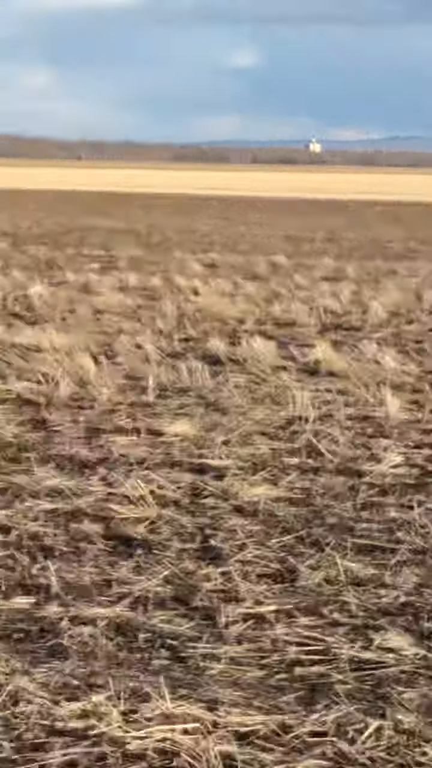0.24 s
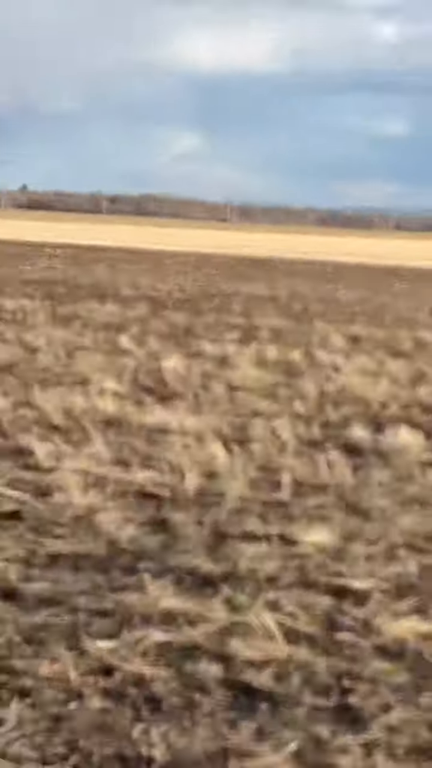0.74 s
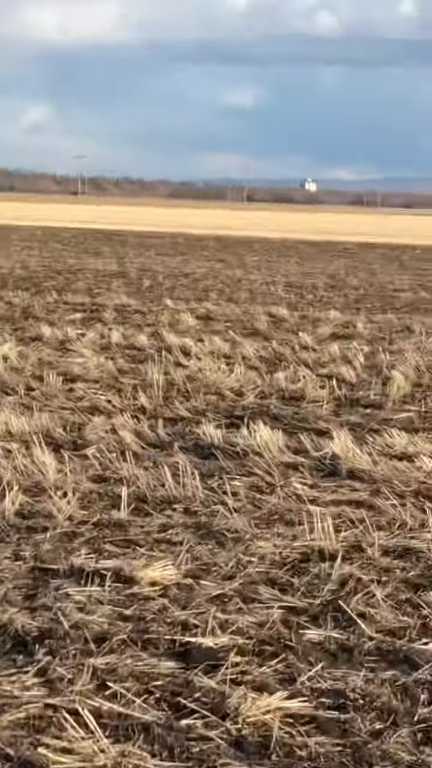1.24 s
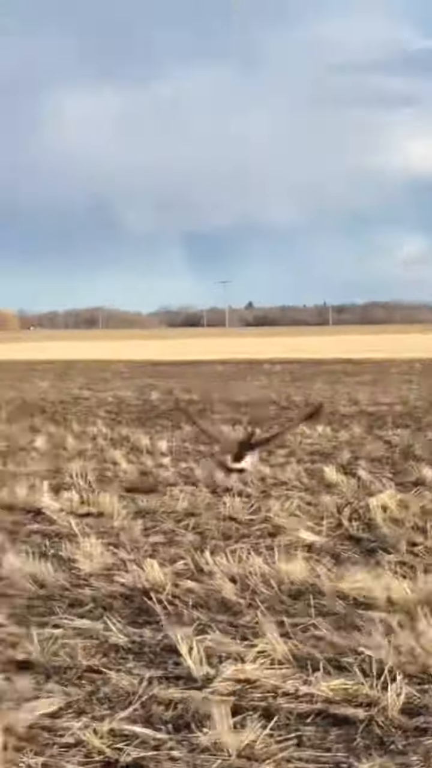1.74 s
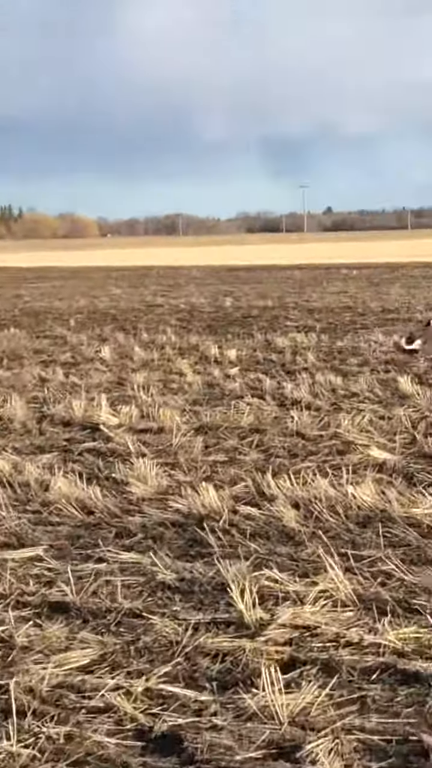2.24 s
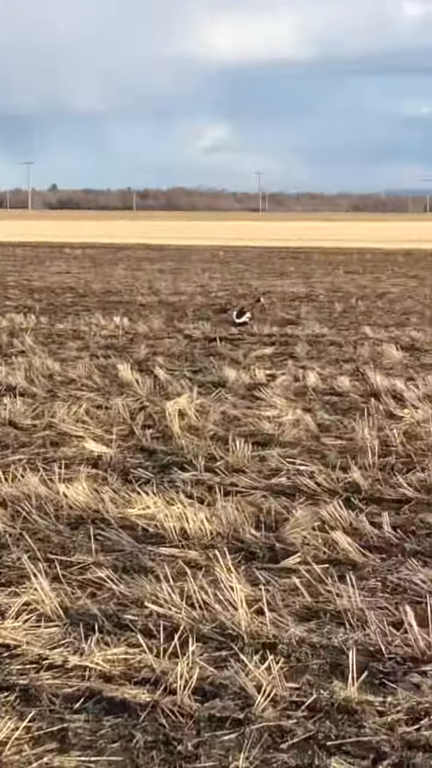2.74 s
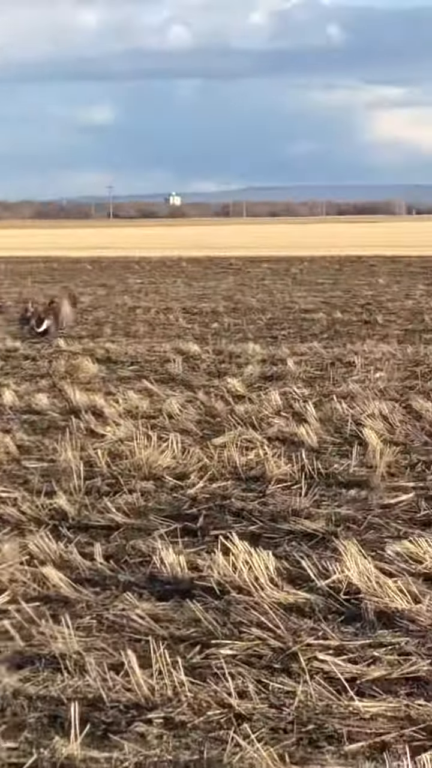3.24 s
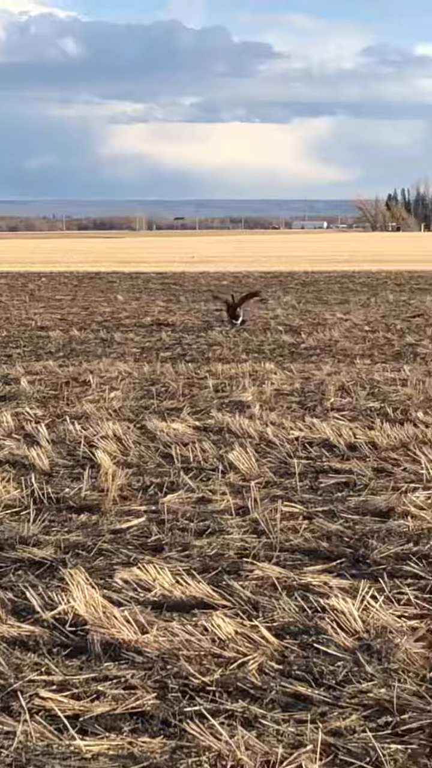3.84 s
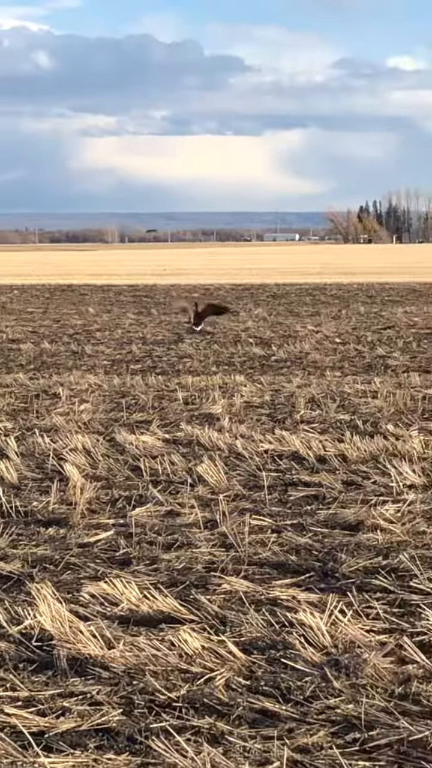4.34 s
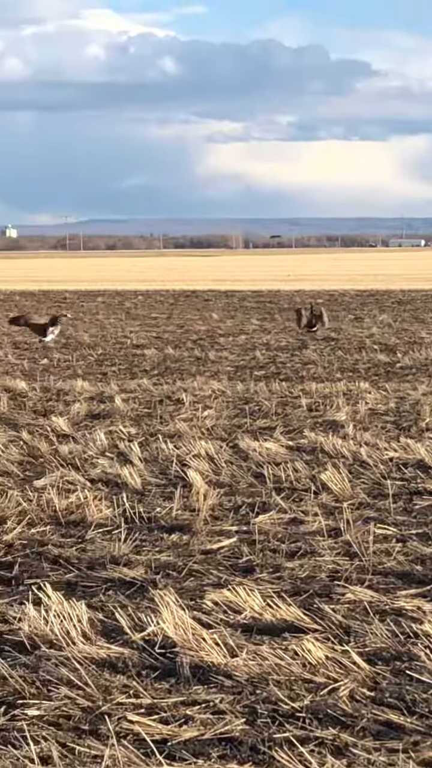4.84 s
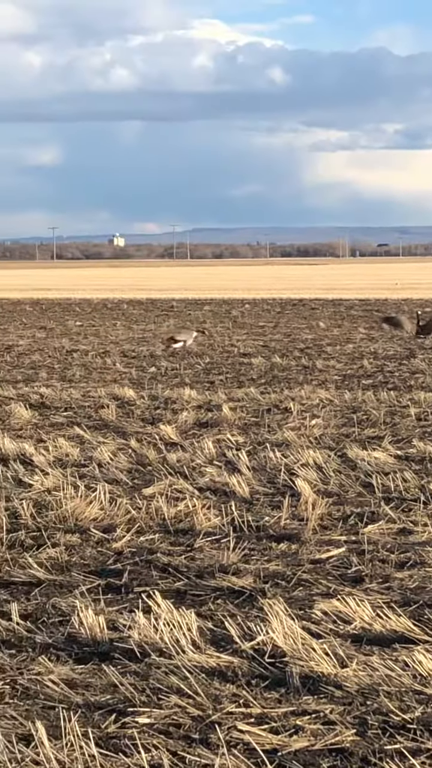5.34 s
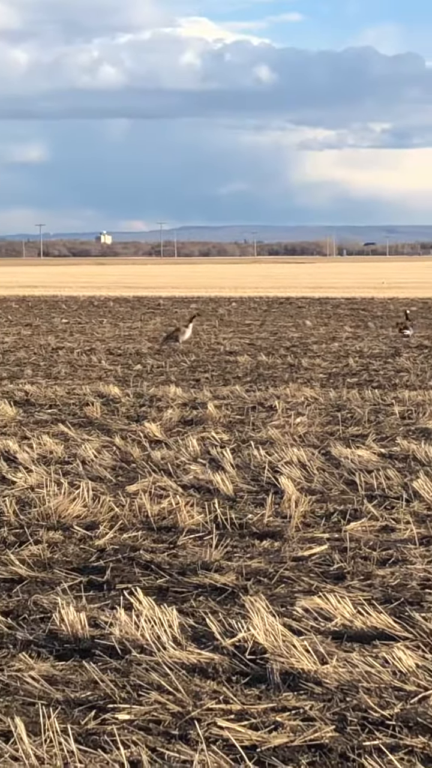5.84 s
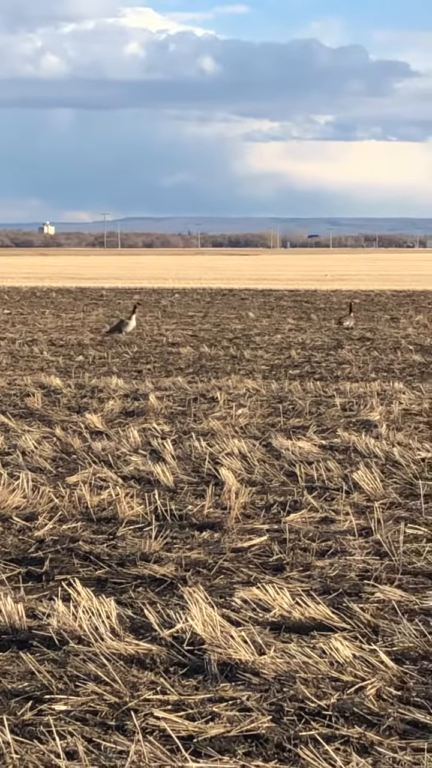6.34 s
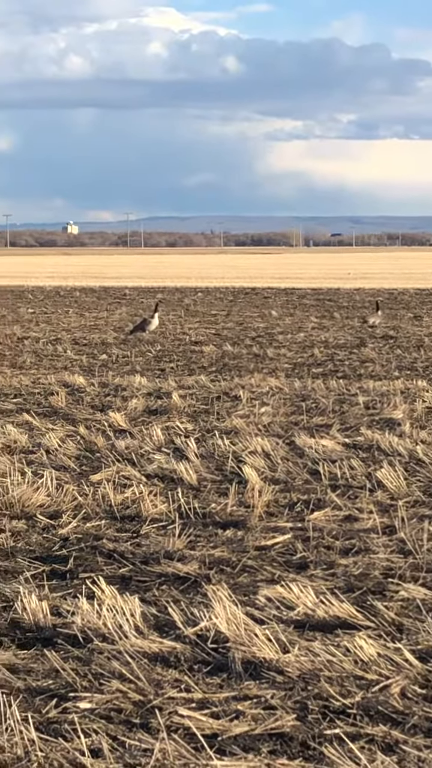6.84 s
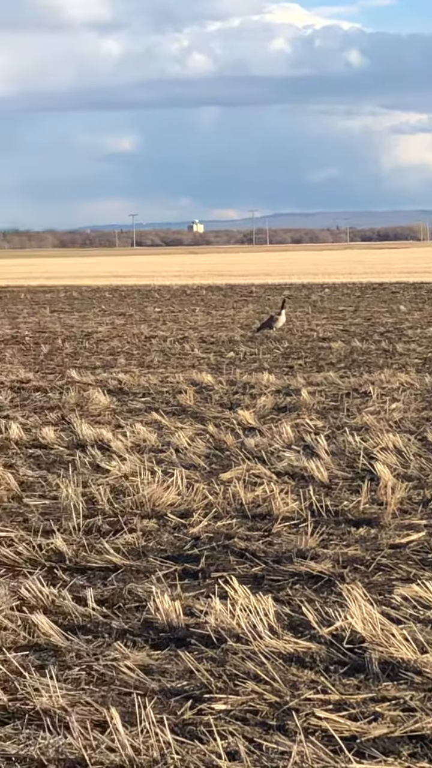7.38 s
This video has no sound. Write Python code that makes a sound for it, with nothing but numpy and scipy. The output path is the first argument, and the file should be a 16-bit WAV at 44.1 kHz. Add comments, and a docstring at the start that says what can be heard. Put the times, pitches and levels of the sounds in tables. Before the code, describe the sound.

An open field without echo, heard through a handheld phone. From 0 s dry straw crackles and cloth rubs close by, with sharp stalk snaps, soft low bumps and gusty wind murmur. At 0.5-0.7 s a goose gives a loud, cracked nasal honk, rising from rough to clear; another two-part call comes at 0.9-1.2 s, and a raspy then longer clear honk at 1.9-2.2 s. Wind drops out around 2.1 s. By 2.4 s a big slow engine far off swells into a deep steady throb, with low gliding moans at 2.3-3 and 3.5-4.1 s. Weaker honks follow: a longer one at 3.2-3.6 s, short buzzy ones at 3.7-4 s and a tiny croak at 4.7 s. Rustling becomes sparse. The rumble strengthens to 7.5 s over faint hiss, with a bump at 6.5 s, faint rapid high pips around 7 s, and a last small rustle.

```python
"""Geese honk close to a phone in an open stubble field: partials of a fast membrane, chopped by a slower one.
Straw and cloth beside it rustle, bump, tick and swish, made of filtered noise grains and short tone bursts.
A big slow engine idles far off, a stack of wavering cosine orders whose throb swells, with low gliding moans
and a short run of faint high pips. Wind murmurs low over a faint field hiss, both of coloured noise."""
import sys
import numpy as np
from scipy import signal
from scipy.fft import rfft, irfft, next_fast_len
from scipy.io import wavfile
from scipy.ndimage import uniform_filter1d

SR = 44100
rng = np.random.default_rng(int(sys.argv[2]) if len(sys.argv) > 2 else 0)


def master(y):
    """Save y as 16-bit WAV."""
    cut = np.clip(np.atleast_2d(y).T, -1, 1)
    pcm = np.round(cut * 32767)  # scale
    wavfile.write(sys.argv[1], SR, pcm.astype(np.int16))


N = 335601  # samples in the scene
ENGINE_HZ = 23.08  # engine cycle rate


def undb(db):
    """Amplitude factor of a level in dB."""
    return 10 ** (np.asarray(db) / 20)


def shape(points, hz):
    """dB of a (Hz, dB) outline, straight on a log axis."""
    f, db = np.transpose(points)
    return np.interp(np.log(np.maximum(hz, 1)), np.log(f), db)


def colour(x, points):
    """Filter to a (Hz, dB) outline and bring to rms 1."""
    n = next_fast_len(len(x), True)
    bins_hz = np.arange(n // 2 + 1) * SR / n
    y = irfft(rfft(x, n) * undb(shape(points, bins_hz)), n)[:len(x)]
    return y / np.sqrt(np.mean(y ** 2))


def band(x, lo_hz, hi_hz):
    """Band-pass between two corners, the upper one at most 20 kHz."""
    return signal.sosfilt(signal.butter(2, [lo_hz, min(hi_hz, 20000)], "band", fs=SR, output="sos"), x)


def walk(rate, size=N):
    """Random levels held 1 / rate s and slewed twice; spread near 1."""
    k = max(int(SR / rate), 1)
    held = np.repeat(rng.standard_normal(size // k + 1), k)
    return 1.3 * uniform_filter1d(uniform_filter1d(held, k), k)[:size]


def span(table, fade_s):
    """Sample range, interpolated columns and a soft-edged gate of one table."""
    s, *columns = np.transpose(table)
    at = np.arange(int(s[0] * SR), min(int(s[-1] * SR), N))
    t = at / SR
    gate = np.clip(np.minimum(t - s[0], s[-1] - t) / fade_s, 0, 1)
    return at, [np.interp(t, s, c) for c in columns], gate


def follow(points):
    """Amplitude along the scene from (s, dB) points."""
    return undb(np.interp(np.arange(N) / SR, *np.transpose(points)))


def blips(table, cycles):
    """Short rounded tone bursts from rows of (start s, level dB, pitch Hz)."""
    out = np.zeros(N)
    for s, db, hz in table:
        t = np.arange(int(cycles * SR / hz))
        i = int(s * SR)
        out[i:i + len(t)] += undb(db) * np.hanning(len(t)) * np.sin(2 * np.pi * hz * t / SR)
    return out


def geese():
    """Partials of the fast membrane, each with side lines from the slow one, all through the throat."""
    # One row a note. Each row: start, length and release in seconds, level in dB at start and at end,
    # lift of the upper partials by the open bill in dB per octave at start and at end,
    # bend of that change (under 1 early, over 1 late), voice, pitches in Hz at even steps along the note.
    honks = [ (0.507, 0.037, 0.012, -35, -38, -10, -5, 1.01, "breaking", [735, 750, 777, 750]),
             (0.541, 0.061, 0.012, -35, -33, -11, 2.5, 1.2, "croaking", [500, 516, 536, 548, 545]),
             (0.594, 0.106, 0.027, -28.5, -31.5, -1.5, -10, 0.9, "clear", [745, 735, 703, 715, 722, 699]),
             (0.86, 0.09, 0.012, -56, -32.5, 3, 1.5, 0.6, "hoarse", [507, 520, 532, 545, 582]),
             (0.95, 0.015, 0.02, -40, -37.5, 2, 6, 1.01, "hoarse", [745, 690]),
             (1.074, 0.035, 0.012, -35, -35, -1, -2, 1.01, "breaking", [724, 735, 765, 730]),
             (1.104, 0.032, 0.012, -46, -33, 5, -3, 0.4, "croaking", [512, 538, 533]),
             (1.133, 0.082, 0.03, -26.5, -31.5, -3, -7, 1.01, "clear", [743, 722, 714]),
             (1.89, 0.112, 0.012, -49, -37.5, 1.5, 4.5, 0.7, "rasping", [519, 506, 520, 585, 566, 592]),
             (1.994, 0.206, 0.03, -34.5, -36, -7, 2.5, 4, "clear", [736, 740, 750, 731, 735, 742, 758, 730]),
             (3.2, 0.048, 0.012, -44, -47, 3, 5, 1.01, "hoarse", [675, 700, 755]),
             (3.25, 0.295, 0.022, -41.5, -39, -4, -4.5, 1.01, "clear", [500, 535, 552, 524, 522, 527, 536, 542, 545]),
             (3.553, 0.02, 0.027, -48, -41.5, -3, -6, 1.01, "buzzing", [752, 714]),
             (3.7, 0.065, 0.012, -58, -46.5, 4, 10, 1.01, "rasping", [525, 553, 559]),
             (3.768, 0.045, 0.018, -41, -52, 8, 20.5, 0.4, "buzzing", [796, 779]),
             (3.908, 0.097, 0.027, -48, -36, 21, -5.5, 0.25, "clear", [708, 734, 734, 728, 720]),
             (4.702, 0.03, 0.02, -48.5, -51, 8, 16, 0.4, "croaking", [675, 709]), ]
    # Voice by name: flutter depth at the start and at the end (0-1), roughness (0-1).
    voices = {"clear": (.08, 0, .008), "breaking": (0, .55, .03), "croaking": (.25, 1, .07),
              "buzzing": (.75, .55, .035), "hoarse": (1, .45, .22), "rasping": (.9, 1, .36)}
    # The fast membrane favours its lowest two partials. Levels in dB of partials 1, 2, 3 ..; the last one repeats.
    partials_db = [0, -0.5, -8.5, -14, -12, -11, -9.5, -17.5]
    # Resonances of windpipe and bill. Each row: frequency in Hz, gain in dB.
    throat = [(300, -12.5), (750, -8.5), (1100, 3), (1350, 5.5), (1700, -4), (2200, 1), (2900, -3.5),
              (3700, -10), (4500, -19), (5500, -13.5), (7000, -19.5), (9500, -25), (13000, -37)]
    # Side lines are faint unless they fall on the windpipe resonance or ride the bright partials.
    # Each row: frequency in Hz, gain in dB.
    side_lines = [(500, -10), (950, -18.5), (1300, -2.5), (1700, -6), (2500, -6.5), (5000, -8.5)]
    flutter_hz = 212.6  # the slower membrane that chops the raspy notes
    out = np.zeros(N)
    for *note, kind, pitches_hz in honks:
        start_flutter, end_flutter, rough = voices[kind]
        at, hz, db, bright_db, gate = sing(*note, pitches_hz)
        size = len(at)
        phase = 2 * np.pi * np.cumsum(hz * (1 + 0.14 * rough * walk(400, size))) / SR
        slow = 2 * np.pi * np.cumsum(flutter_hz * (1 + 0.18 * rough * walk(135, size))) / SR
        flutter = np.linspace(start_flutter, end_flutter, size)
        voice = 0
        for k in range(1, 17):
            octaves_up = np.log2(np.clip(k * hz, 2 * hz, 3300) / (2 * hz))
            k_db = partials_db[min(k, len(partials_db)) - 1] + bright_db * octaves_up
            # the open bill lifts the middle partials more than the very top
            k_db = k_db - 0.41 * np.maximum(bright_db, 0) * np.log2(np.maximum(k * hz / 4500, 1))
            # upper partials swell and fade on their own as bill and neck move
            k_db = k_db + (k > 3) * 3.2 * walk(30, size)
            start = 2 * np.pi * rng.random()
            for side in (0, -1, 1):
                line_hz = k * hz + side * flutter_hz
                line_db = k_db + shape(throat, line_hz) - shape(throat, 2 * hz)
                line_db = line_db + abs(side) * shape(side_lines, line_hz)
                line = np.cos(k * phase + side * slow + start)
                voice = voice + flutter ** abs(side) * undb(line_db) * line
        # air rushes past the membranes as they lose contact
        breath = rough * colour(rng.standard_normal(size), throat) * (1 + np.cos(slow))
        out[at] += gate * undb(db) * (np.sqrt(2) * voice + 0.74 * breath)
    return out


def sing(start_s, length_s, release_s, db0, db1, bright0_db, bright1_db, bend, pitches_hz):
    """Samples, pitch, level, bill lift and gate of one note, which fades and sags as the breath runs out."""
    attack_s, release_db, sag_hz_per_s = .005, 20, 1900
    effort_db_per_hz = 0.06  # pushing harder raises pitch and level together
    at = np.arange(int(start_s * SR), int((start_s + length_s + release_s) * SR))
    t = at / SR - start_s
    u = np.clip(t / length_s, 0, 1)
    late = np.maximum(t - length_s, 0)
    hz = np.interp(u, np.linspace(0, 1, len(pitches_hz)), pitches_hz)
    # only pitch above or below the straight glide counts as effort
    push_db = effort_db_per_hz * (hz - hz[0] - (hz[-1] - hz[0]) * u)
    db = db0 + (db1 - db0) * u ** bend + push_db - release_db * late / release_s
    bright_db = bright0_db + (bright1_db - bright0_db) * u ** bend
    gate = np.clip(np.minimum(t, length_s + release_s - t) / attack_s, 0, 1)
    return at, hz - sag_hz_per_s * late, db, bright_db, gate


def rustle():
    """Dense crackle of uneven grains over rubbing noise, in a bright and a dull part."""
    # The faint rustle between rubs. Each row: time in seconds, level of the top in dB, body over top in dB.
    faint = [(0, -69, -8), (0.55, -74, -5), (1.35, -69, 2), (2.6, -72, 0.5), (3.05, -82, 0.5),
             (4.3, -83, 4), (5.5, -88, 12), (6.8, -84, 9), (7.3, -88, 10), (7.55, -79, 8)]
    # Straw and cloth rubbed. Each row: strongest moment in seconds, seconds to rise 10 dB,
    # seconds to fall 10 dB, peak level of the top in dB, body over top in dB.
    rubs = [(0.03, .1, .08, -58.5, 0.5), (0.434, .02, .017, -50, 3), (0.78, .04, .08, -57, 1),
            (0.857, .05, .03, -53, 6), (0.943, .06, .04, -58, 5), (1.147, .06, .055, -50, -5),
            (1.3, .03, .05, -66, 8), (1.537, .018, .055, -52, 5), (1.686, .015, .06, -60, 0.5),
            (1.756, .05, .05, -60, -10), (1.851, .01, .02, -55, -10), (1.886, .03, .025, -51, 5),
            (1.94, .05, .06, -64, 6), (2.135, .03, .02, -60, -10), (2.175, .03, .08, -57, -5),
            (2.235, .07, .08, -49, -5), (2.29, .04, .025, -58, 5), (2.434, .15, .05, -64, 3),
            (2.72, .015, .15, -60.5, 0.5), (2.794, .08, .02, -64, 0.5), (2.878, .1, .035, -66, 3),
            (3.118, .012, .06, -67, 10), (3.268, .09, .2, -62, 1.5), (3.64, .1, .1, -80, 19),
            (3.756, .03, .07, -69.5, 11), (4.116, .05, .06, -75, -3), (4.745, .02, .04, -77, 19),
            (4.88, .08, .08, -80, 8), (5.0, .06, .1, -80, 8), (5.3, .1, .1, -82, 8),
            (5.49, .04, .04, -81, 20), (7.05, .3, .15, -82, 8), (7.565, .015, .4, -67, 5)]
    # Tone of the rubbing. Each row: frequency in Hz, density in dB per Hz.
    outline = [(150, -21.5), (300, -10), (600, -8), (1400, -9.5), (2500, -10), (4400, -13), (8500, -21),
               (12600, -20.5), (15000, -19), (16000, -19)]
    parts = []
    # share: part of the samples that carry a grain
    for lo_hz, hi_hz, share, patchy_db in ((2390, 20000, .4, 2.15), (180, 2570, .02, 2.4)):
        grains = rng.standard_normal(N) * undb(3.13 * rng.exponential(size=N)) * (rng.random(N) < share)
        rub = colour(grains / grains.std() + rng.standard_normal(N), outline)
        rub = rub * undb(patchy_db * (walk(50) + 0.76 * walk(300)))
        parts.append(band(rub, lo_hz, hi_hz))
    # both parts are scaled by the strength of the upper treble
    top, body = np.array(parts) / band(parts[0], 9570, 16050).std()
    s, db, body_db = np.transpose(faint)
    t = np.arange(0, N + 32, 32) / SR  # coarse time for the envelopes
    top_power = undb(2 * np.interp(t, s, db))
    body_power = top_power * undb(2 * np.interp(t, s, body_db))
    for s, rise_s, fall_s, db, body_db in rubs:
        power = undb(2 * db - 20 * np.maximum((s - t) / rise_s, (t - s) / fall_s))
        top_power = top_power + power
        body_power = body_power + power * undb(2 * body_db)
    fine_t = np.arange(N) / SR
    top_level = np.interp(fine_t, t, np.sqrt(top_power))
    body_level = np.interp(fine_t, t, np.sqrt(body_power))
    return top_level * top + body_level * body


def ticks():
    """Each stalk cracks for a millisecond or two, with a duller knock that is strong in some."""
    # Snapping stalks. Each row: start in seconds, peak of the crack in dB, knock over crack in dB.
    snaps = [(0.0184, -32.5, -7), (0.0548, -32, -7), (0.0807, -37, 2), (0.1306, -43.5, 9),
             (0.1481, -46.5, 9), (0.187, -43, 5), (0.2404, -47.5, 17), (0.2648, -44, -9.5),
             (0.7532, -43.5, 9.5), (0.7726, -41.5, 13), (0.8387, -34.5, 9), (0.8515, -27.5, -6),
             (1.2635, -44, 0), (1.4825, -41, -15), (1.5229, -27.5, -7), (1.5404, -35, -6),
             (1.6866, -36.5, 3.5), (1.7434, -45, 11.5), (1.8552, -38, 9), (1.8751, -27.5, 1.5),
             (1.935, -46, 12), (2.2814, -39.5, 11.5), (2.4644, -54, 12), (2.6344, -46, -1),
             (2.7831, -40, -3), (2.8444, -45, -8), (3.1192, -44, 8), (4.0497, -58, 11), (4.4508, -42, -4.5),
             (5.4884, -63, 15), (7.07, -53, -3), (7.416, -51, 9), (7.5208, -55.5, 18)]
    out, t = np.zeros(N), np.arange(600) / SR
    for s, db, low_db in snaps:
        crack = band(rng.standard_normal(600) * np.exp(-t / .0011), 2500, 15000)
        knock = band(rng.standard_normal(600) * np.exp(-t / 0.0014), 630, 2550)
        i = int(s * SR)
        out[i:i + 600] += undb(db) * (crack / abs(crack).max() + undb(low_db) * knock / abs(knock).max())
    return out


def swish():
    """Woven cloth slides with an airy whistle: noisy bands at the thread rate and its multiples."""
    # One table a slide. Each row: time in seconds, thread rate in Hz, level in dB before the gain of each band.
    slides = [
        [(0.98, 1770, -51), (1.06, 1740, -65)],
        [(1.63, 1763, -57), (1.7, 1778, -53), (1.85, 1835, -57)],
        [(2.44, 1900, -60), (2.892, 1864, -60), (2.98, 1790, -68)],
        [(4.46, 1575, -74), (4.656, 1590, -67), (4.68, 1590, -78)],
        [(6.82, 1480, -70), (7.0, 1500, -64), (7.08, 1480, -72)],
    ]
    out = np.zeros(N)
    for table in slides:
        at, (hz, db), gate = span(table, 0.013)
        phase = 2 * np.pi * np.cumsum(hz) / SR
        for k, k_db in ((1, 3), (2, -7), (3, -16)):
            level = gate * undb(db + k_db + 2.2 * walk(36.7, len(at)))
            out[at] += level * walk(450, len(at)) * np.cos(k * phase)
    return out


def bumps():
    """Soft bumps against the phone, each a few rounded cycles of a low tone."""
    # Each row: start in seconds, peak level in dB, pitch in Hz.
    knocks = [(0.118, -47, 287), (0.301, -45.5, 355), (0.383, -50, 332), (0.78, -39.5, 366),
              (1.119, -39, 242), (1.429, -48.5, 318), (1.52, -41.5, 283), (1.697, -41.5, 353),
              (1.791, -45, 342), (2.256, -44, 255), (6.489, -46, 205)]
    return blips(knocks, 7.9)


def engine():
    """Steady orders of the engine cycle, each wavering on its way through the air."""
    # Strength of the orders. Each row: multiple of the cycle rate, level in dB.
    orders = [(2, -20.5), (3, -19), (4, -6.5), (5, -1), (6, -16.5), (7, -13.5), (8, -18), (9, -27),
              (10, -28.5), (12, -40), (13, -37), (14, -38), (15, -50), (16, -37), (17, -35.5)]
    # Engine as heard. Each row: time in seconds, level in dB, lift of the orders over the fifth in dB.
    swell = [(0.1, -66, -14), (0.35, -57, -12), (0.5, -51, -4), (1.08, -51, -1), (1.35, -59, 5),
             (2.12, -52, 3.5), (2.41, -37, -6), (2.9, -38, -3), (4.5, -37.5, -2.5), (5.03, -35.5, -6),
             (5.55, -37, 2), (7.5, -32.5, 1.5)]
    # The strongest order fades briefly on its way over the field.
    # Each row: middle in seconds, half width in seconds, depth in dB.
    fades = [(2.65, .15, -9), (4.72, .14, -6)]
    step = 8  # samples between values of the low engine tones
    t = np.arange(0, N, step) / SR
    s, db, high_db = np.transpose(swell)
    db, high_db = np.interp(t, s, db), np.interp(t, s, high_db)
    fade_db = sum(depth_db * np.exp(-((t - mid_s) / half_s) ** 2) for mid_s, half_s, depth_db in fades)
    phase = 2 * np.pi * (ENGINE_HZ * t + .36)
    throb = 0
    for k, k_db in orders:
        side_db = high_db if k > 5 else fade_db if k == 5 else 0
        # the exhaust pipe delays orders on either side of its resonance, so each firing is a short sweep
        sweep = 1.1 * (k - 5) ** 2 + .06 * (k - 5) ** 3
        # times step, as these walks run on the coarse time: 7 and 6 new values a second
        drift = sweep + .22 * walk(7 * step, len(t))
        waver_db = 1.2 * walk(6 * step, len(t))
        throb = throb + undb(k_db + side_db + waver_db) * np.cos(k * phase + drift)
    throb = signal.resample_poly(np.sqrt(2) * throb * undb(db), step, 1)[:N]
    # uneven firings fill the gaps between the orders
    outline = [(25, -31), (45, -8.5), (90, 4), (130, 2.5), (190, -12), (270, -40.5), (500, -68)]
    uneven = colour(rng.standard_normal(N), outline)
    return throb + uneven * np.interp(np.arange(N) / SR, t, undb(db - 11))


def moans():
    """Two low moans from far off: sine tones that glide up, then ease down a little."""
    # One table a moan. Each row: time in seconds, pitch in Hz, level in dB.
    glides = [
        [(2.25, 62, -46), (2.508, 68.9, -47), (3.0, 68.7, -47), (3.05, 67.5, -66)],
        [(3.5, 61, -38), (3.758, 74.2, -43), (4.1, 72, -53)],
    ]
    out = np.zeros(N)
    for table in glides:
        at, (hz, db), gate = span(table, 0.24)
        out[at] += np.sqrt(2) * gate * undb(db) * np.sin(2 * np.pi * np.cumsum(hz) / SR)
    return out


def pips():
    """Faint high pips at the engine cycle rate for a while, each of uneven strength and pitch."""
    from_s, to_s, mean_db, mean_hz = 6.8104, 7.27, -65, 2630
    times = np.arange(from_s, to_s, 1 / ENGINE_HZ)
    chance = rng.standard_normal((len(times), 2))
    return blips(zip(times, mean_db + 4.5 * chance[:, 0], mean_hz + 70 * chance[:, 1]), 22.)


def wind():
    """Gusty low wind on the phone: coloured noise with a quickly wandering level."""
    # Each row: time in seconds, level in dB.
    gusts = [(0.0, -49.5), (0.72, -55.5), (0.78, -44.5), (1.06, -49.5), (1.12, -46), (1.25, -52),
             (1.57, -49.5), (2.03, -51), (2.12, -85), (2.25, -57), (2.46, -70), (4.26, -79), (7.61, -92)]
    # Tone of the wind. Each row: frequency in Hz, density in dB per Hz.
    outline = [(15, -49), (25, 1.5), (102, 15), (134, 3.5), (153, 5.5), (204, 6), (281, -6.5), (600, -20.5),
               (780, -38), (1320, -120)]
    # the added point holds everything above 1200 Hz at -73 dB
    murmur = colour(rng.standard_normal(N), outline + [(1200, -73)])
    return murmur * undb(3.2 * walk(13)) * follow(gusts)


def field_hiss():
    """Smooth distant hiss of the field: coloured noise that swells a little."""
    # Each row: time in seconds, level in dB.
    swell = [(0, -57), (2, -60), (4, -65.5), (5.5, -62), (6.5, -64), (7, -62), (7.6, -59)]
    # Tone of the hiss. Each row: frequency in Hz, density in dB per Hz.
    outline = [(250, -2), (420, -2.5), (630, -7.5), (1000, -4.5), (1500, -4.5), (1800, -11.5),
               (3500, -19.5), (6200, -29), (14800, -34.5), (16000, -36)]
    hiss = colour(rng.standard_normal(N), [(120, -29.5)] + outline)
    return hiss * undb(0.67 * walk(5)) * follow(swell)


def scene():
    """Close sounds over the far engine, moans and pips, and the open air."""
    close = geese() + rustle() + ticks() + swish() + bumps()
    far = engine() + moans() + pips()
    return (close + far + wind() + field_hiss())[None]


def record(dry):
    """The phone cuts the deepest bass and the top."""
    bass_hz, top_hz = 38, 15900
    dry = signal.sosfilt(signal.butter(2, bass_hz, "high", fs=SR, output="sos"), dry)
    return signal.sosfilt(signal.ellip(10, .2, 70, top_hz, fs=SR, output="sos"), dry)


dry = scene()
out = record(dry)
master(out)
```